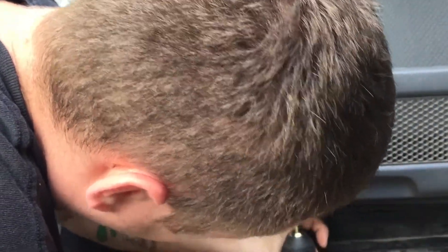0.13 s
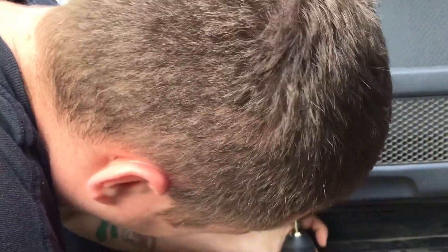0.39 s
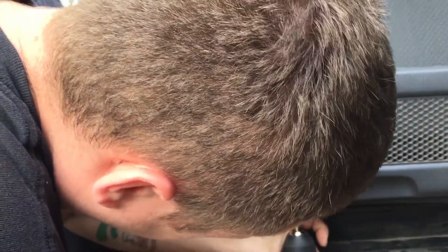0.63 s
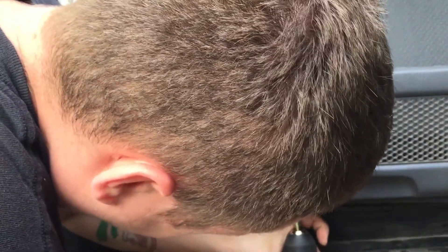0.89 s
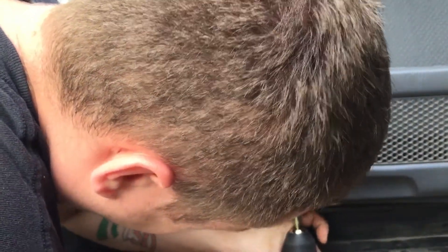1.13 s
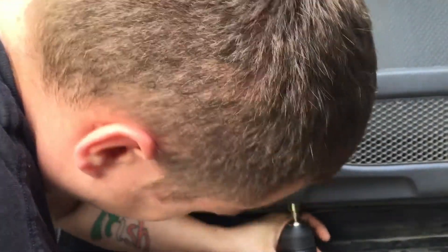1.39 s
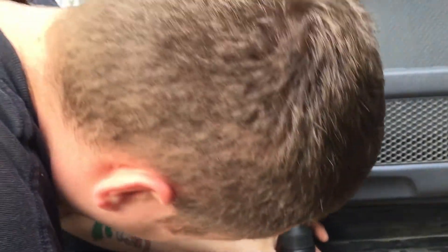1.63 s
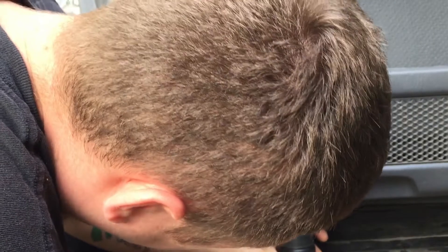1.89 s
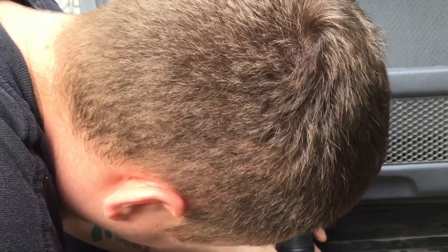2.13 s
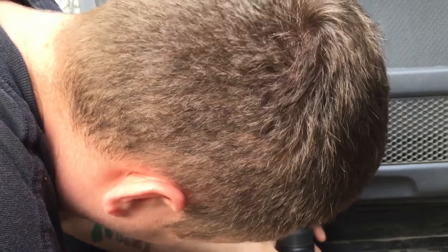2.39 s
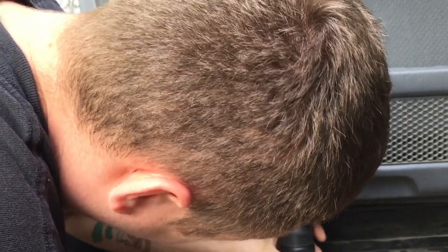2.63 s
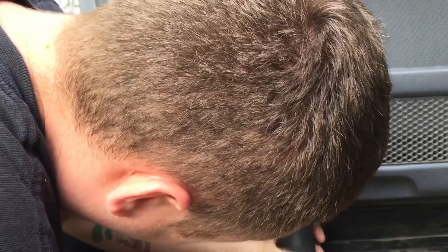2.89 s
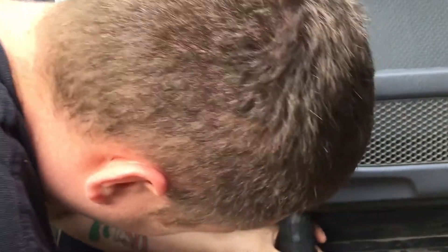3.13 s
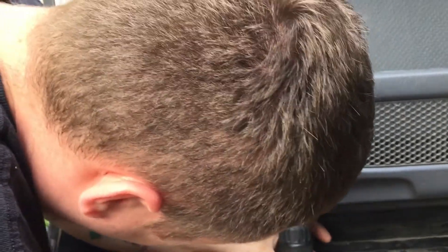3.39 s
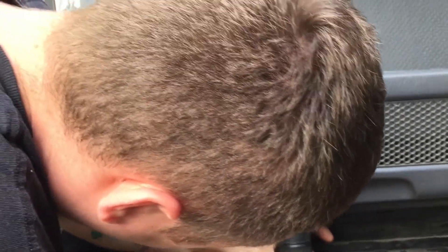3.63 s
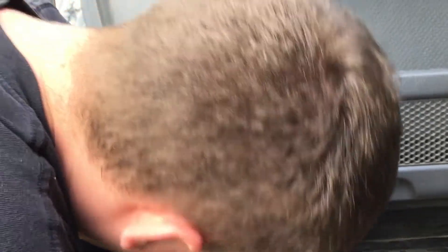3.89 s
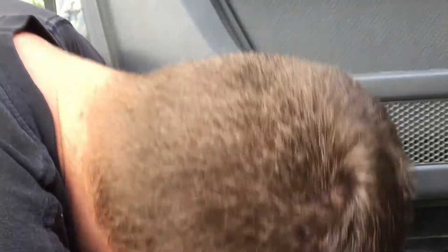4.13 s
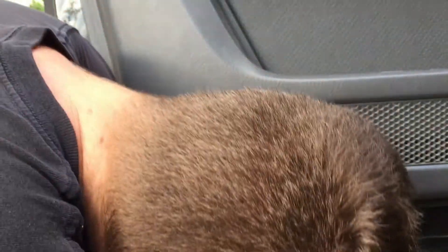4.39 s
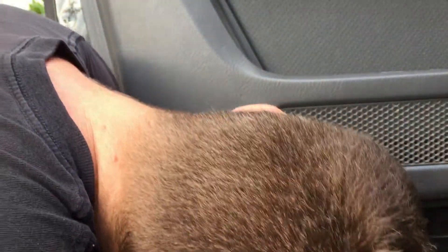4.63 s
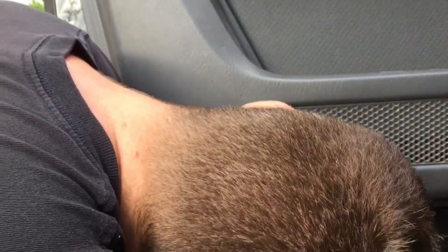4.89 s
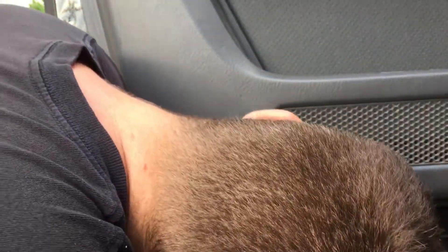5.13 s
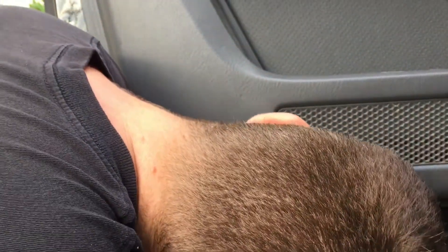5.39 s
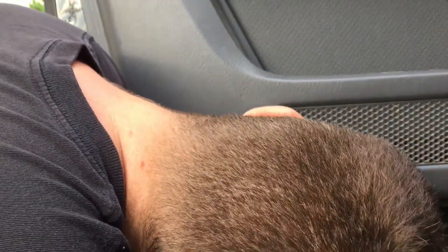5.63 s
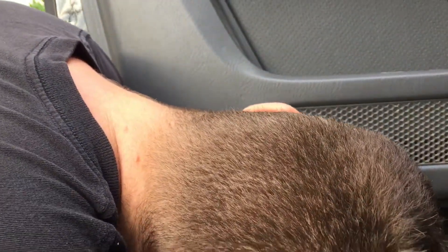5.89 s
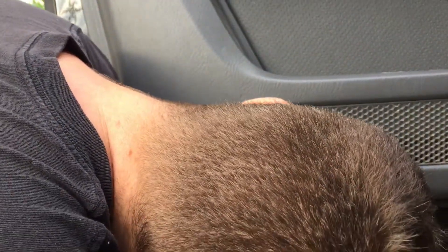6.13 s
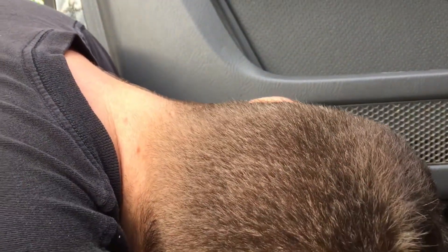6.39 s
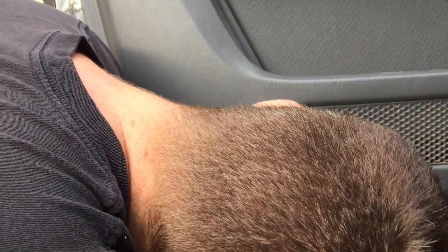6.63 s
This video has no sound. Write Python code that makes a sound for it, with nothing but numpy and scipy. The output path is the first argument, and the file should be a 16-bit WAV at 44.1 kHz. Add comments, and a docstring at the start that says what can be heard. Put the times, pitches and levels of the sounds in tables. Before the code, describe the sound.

Close harsh drill whine and gritty sawing on a plastic panel in three trigger pulls, with knocks, faint squeaks and low outdoor rumble between.

```python
"""A cordless drill is already whining as it drives a hole saw into a plastic door panel: three trigger pulls.
Motor and gears are sines locked to the rotor speed, over a grinding hiss that throbs once a turn.
The saw snags and blows ring the panel's modes; short squeaks are rough glides.
Outdoors lie a low resonant rumble, swelling hums, a faint noise floor and a thin insect-like whistle.
The door is close and echoes densely; one microphone feeds both channels."""
import sys
import numpy as np
from scipy import signal
from scipy.fft import rfft, irfft
from scipy.io import wavfile
from scipy.ndimage import uniform_filter1d

SR = 44100
rng = np.random.default_rng(int(sys.argv[2]) if len(sys.argv) > 2 else 0)


def boost_factor(decibels):
    """Convert a level in decibels to a linear amplitude factor."""
    exponent = np.asarray(decibels, float) / 20
    return 10 ** exponent


def int16_out(signal):
    """Quantize to a 16-bit WAV file."""
    q = np.round(np.clip(np.atleast_2d(signal).T, -1, 1) * 32767)
    wavfile.write(sys.argv[1], SR, q.astype(np.int16))


N = 298116   # length in samples


def curves(rows, before=None):
    """Columns of a table as sample curves; outside the table they hold, or take the value given."""
    s, *columns = np.transpose(rows)
    return [np.interp(np.arange(N) / SR, s, c, before, before) for c in columns]


def unit(x):
    """Scale to rms 1."""
    return x / np.sqrt(np.mean(x ** 2) + 1e-20)


def drift(rate):
    """Slow chance of spread 1, changing about rate times a second: noise through a double one-pole lowpass."""
    points_per_s = 400
    points = rng.standard_normal(int(N / SR * points_per_s) + points_per_s)
    r = np.exp(-2 * np.pi * rate / points_per_s)
    settled = signal.lfilter([1], [1, -2 * r, r * r], points)[points_per_s - 1:]
    slow = unit(settled)
    return np.interp(np.arange(N) / SR * points_per_s, np.arange(len(slow)), slow)


def colour(x, spectrum):
    """Give x the spectrum of (Hz, dB) points, joined over log frequency."""
    hz = np.maximum(np.arange(N // 2 + 1) * SR / N, 1)
    points = np.array(spectrum)
    level_db = np.interp(np.log(hz), np.log(points[:, 0]), points[:, 1])
    return irfft(rfft(x) * boost_factor(level_db), N)


def ring(x, hz, width_hz):
    """One resonance; a unit click rings at height 1."""
    r, w = np.exp(-np.pi * width_hz / SR), 2 * np.pi * hz / SR
    return signal.lfilter([0, np.sin(w)], [1, -2 * r * np.cos(w), r * r], x + 1e-18)


def line(turns, order, level_db, waver_db, blur):
    """A sine locked to the turns, its level (dB) and phase (rad) wandering."""
    level = np.sqrt(2) * boost_factor(level_db + waver_db * drift(12.2))
    return level * np.sin(2 * np.pi * order * turns + blur * drift(16.7))


def rotor():
    """The rotor spins up with a lag and slows ever faster once eased off; the gates follow the trigger."""
    # trigger pulls: pulled_s, eased_off_s, stopped_s, grind_db, treble_hiss_db
    pulls = [(-1, 3.125, 3.19, -31, -28), (3.619, 4.02, 4.15, -33, -31), (5.339, 9, 9, -29.8, -32.5)]
    # rotor speed that the load allows, one table a pull: time_s, speed_turns_per_s
    allowed_speed = [
        [(0, 297), (0.5, 296), (0.65, 293), (1.25, 291), (1.29, 262), (1.33, 240), (1.37, 236), (1.4, 254),
         (1.49, 264), (1.65, 263), (1.75, 258), (1.95, 244), (2.05, 242), (2.35, 241), (2.45, 235), (2.75, 232),
         (2.9, 222), (2.97, 223), (3.05, 247), (3.14, 262)],
        [(3.83, 282), (3.97, 284.5)],
        [(5.95, 281), (6.15, 275), (6.58, 275), (6.76, 266)],
    ]
    spin_up_lag, spin_up_s = 117, .048   # turns per s short at the pull, time constant of closing the gap
    brake = 3400   # turns per s lost per s squared
    attack_s, stop_db_per_s = .006, 900
    hiss_attack_s, hiss_stop_db_per_s, hiss_stops_early_s = .025, 600, .03

    t = np.arange(N) / SR
    pull = np.searchsorted([row[0] for row in pulls], t) - 1
    pulled, eased, stopped, grind_db, hiss_db = np.transpose(pulls)[:, pull]
    held = np.choose(pull, [curves(rows)[0] for rows in allowed_speed])
    lag = spin_up_lag * np.exp((pulled - t) / spin_up_s)
    speed = held - lag - brake * np.maximum(t - eased, 0) ** 2
    gate_db = 20 * np.log10(np.minimum((t - pulled) / attack_s, 1) + 1e-6)
    gate_db -= stop_db_per_s * np.maximum(t - stopped, 0)
    hiss_gate_db = 20 * np.log10(1 - np.exp((pulled - t) / hiss_attack_s) + 1e-6)
    hiss_gate_db -= hiss_stop_db_per_s * np.maximum(t - stopped + hiss_stops_early_s, 0)
    return pull, np.maximum(speed, 50), gate_db, hiss_gate_db, grind_db, hiss_db


def gear_lines(turns, speed, pull, bite, load, unsteady_db, gate_db):
    """Saw and gear teeth sound at fixed multiples of rotor speed; the housing favours some of their pitches."""
    slow_gear, fifth, mesh, saw = 3.912, 5, 7.4, .765   # multiples of rotor speed
    # slow gear, fifth order, mesh, its two overtones:
    # free_db, cutting_db, second_pull_db, third_pull_db, waver_db, blur_rad
    gears = [(-42, -36.5, -46, -47, 2.0, .7), (-45, -35, -46, -48, 1.0, .45), (-41, -34, -52, -37, 3.0, .6),
             (-47, -35.5, -46, -44, 3.0, .6), (-44, -38.5, -56, -50, 2.0, .9)]
    # rise of each gear line while the unloaded rotor changes speed: rise_db
    take_up_rises = [22, 0.5, -14, 2.5, -6]
    # how much of the unsteadiness each gear line loses in the first pull and while slowing: share
    break_up_shares = [.3, .01, .01, .3, 1.1]
    # pitches that the housing favours or mutes: pitch_hz, level_db
    housing = [(620, -3), (750, -14), (850, 2), (960, 0.1), (1080, 3), (1170, 5), (1290, -8), (1460, -1),
               (1750, -2), (1890, 6), (1960, 2), (2100, -1), (2900, -14), (3300, 1), (3550, 2), (3700, -8),
               (3900, 3), (4080, -1), (4200, -9), (5000, 2), (5250, -1), (5400, 2), (5560, -7), (5750, -1),
               (6200, -1)]
    # the mesh sings as the freed saw speeds up: start_s, length_s, rise_db
    freed_start, freed_length, freed_rise_db = (3.035, .09, 11)
    brake_take_up = .55   # share of the rise while slowing
    chatter_db, chatter_per_s = 5, 90   # the gears chatter while they take up the torque

    slowing = np.gradient(speed) < 0
    take_up = unsteady_db / unsteady_db.max() * (1 - load) * np.where(slowing, brake_take_up, 1)
    freed = np.clip((np.arange(N) / SR - freed_start) / freed_length, 0, 1)
    out = load * line(turns, saw, -40 + gate_db, waver_db=5.5, blur=0.2)
    orders = (slow_gear, fifth, mesh, 2 * mesh, 3 * mesh)
    for order, rise_db, share, row in zip(orders, take_up_rises, break_up_shares, gears):
        free_db, cut_db, second_db, third_db, waver_db, blur = row
        first_db = free_db + np.maximum(bite, 0) * (cut_db - free_db)
        level_db = np.choose(pull, [first_db, second_db, third_db])
        level_db += np.interp(order * speed, *np.transpose(housing))
        if order == mesh:
            level_db += freed_rise_db * np.sqrt(abs(np.sin(np.pi * freed)))
        level_db += (rise_db + chatter_db * drift(chatter_per_s)) * take_up
        level_db -= share * unsteady_db * ((pull == 0) | slowing)
        out += line(turns, order, level_db + gate_db, waver_db, blur)
    return out


def motor_lines(turns, pull, load, unsteady_db, gate_db, hiss_gate_db):
    """Motor and gear whine: low lines of motor and gears change level with load, and load smears the upper
    commutator lines."""
    # low motor and gear lines: multiple_of_rotor_speed, free_db, cutting_db, later_pulls_db
    low_orders = [(1, -42, -47, -46), (1.304, -61, -46, -60), (2, -51, -48, -49), (2.608, -43, -49, -44),
                  (5.216, -46, -43, -41), (6, -57, -57, -48), (6.52, -42, -52, -41), (10, -48, -47, -54),
                  (12, -49, -60, -63), (15, -44, -46, -55), (16, -56, -63, -58), (17, -57, -64, -50)]
    # clearer commutator lines: multiple_of_rotor_speed, first_pull_db, second_pull_db, third_pull_db
    upper_orders = [(20, -44, -45, -52), (22, -50, -40, -48), (25, -53, -45, -54), (27, -52, -60, -59),
                    (28, -55, -49, -58), (30, -48, -55, -60), (33, -57, -50, -60), (34, -59, -57, -49),
                    (35, -54, -57, -51), (37, -46, -60, -55), (38, -51, -62, -57), (39, -62, -55, -50),
                    (41, -62, -49, -58), (42, -60, -51, -58), (43, -54, -54, -59), (47, -45, -59, -60)]
    faint_db, cut_smear_db = -61, 7   # level of all other upper lines; loss of upper lines at full load

    out = np.zeros(N)
    for order, free_db, cut_db, later_db in low_orders:
        level_db = np.where(pull == 0, free_db + load * (cut_db - free_db), later_db)
        level_db = level_db + gate_db - np.clip(order / 12, .4, 1.1) * unsteady_db
        out += line(turns, order, level_db, waver_db=3.0, blur=0.43)
    clear = {row[0]: row[1:] for row in upper_orders}
    for order in range(18, 52):
        level_db = np.choose(pull, clear.get(order, [faint_db] * 3)) - cut_smear_db * load
        level_db = level_db + hiss_gate_db - 1.4 * unsteady_db
        out += line(turns, order, level_db, waver_db=2.5, blur=.4)
    return out


def grinding_hiss(turns, bite, load, grind_db, hiss_db, gate_db, hiss_gate_db):
    """Teeth and brushes rub unevenly round the turn: throbbing noise, split at 3 kHz into grind and hiss."""
    # shape of the grinding noise before the split: pitch_hz, level_db
    grind_spectrum = [(150, -8), (250, -23.5), (290, -6.5), (425, -10.5), (580, -4), (800, -5.5), (940, 2),
                      (1150, -3.5), (1310, -5.5), (1500, -2), (2090, 2), (2400, -6.5), (2750, -9.5),
                      (4600, -16.5), (5400, -15.5), (8500, -21), (13200, -21), (15900, -27)]
    bite_grind_db, bite_hiss_db = 5.2, -1.8   # change per unit of bite, change at full load
    freed_hiss_db = 6   # loss of treble hiss per unit of bite below zero, once the saw is through
    snag_s, snag_hiss_db, snag_dip_s = 3.03, -6, .035   # the treble hiss dips as the saw breaks through

    throb = boost_factor(1.6 * np.sin(2 * np.pi * turns) + 0.95 * drift(59))
    snag_db = snag_hiss_db * np.exp(-((np.arange(N) / SR - snag_s) / snag_dip_s) ** 2)
    low_db = grind_db + bite_grind_db * bite + gate_db
    high_db = hiss_db + bite_hiss_db * load + freed_hiss_db * np.minimum(bite, 0) + snag_db + hiss_gate_db
    out = np.zeros(N)
    for kind, level_db in (("low", low_db), ("high", high_db)):
        noise = colour(rng.standard_normal(N) * throb, grind_spectrum)
        split = signal.butter(2, 3000, kind, fs=SR, output="sos")
        out += boost_factor(level_db) * unit(signal.sosfilt(split, noise))
    return out


def drill():
    """One rotor drives the gear lines, the motor lines and the grinding hiss; the bite loads it in the first pull."""
    # how deep the teeth bite (0 running free, 1 cutting, below 0 freed): time_s, bite
    bite_depth = [(1.25, 0.01), (1.29, 1.6), (1.33, 1.45), (1.4, .8), (1.65, .95), (2.2, 1.1), (2.98, 1.05),
                  (3.03, .3), (3.11, -.35), (3.17, -.9)]
    pull, speed, gate_db, hiss_gate_db, grind_db, hiss_db = rotor()
    bite = curves(bite_depth)[0] * (pull == 0)
    load = np.clip(bite, 0, 1)
    turns = np.cumsum(speed * (1 + 0.0005 * drift(7.55))) / SR
    # the fine lines break up while the rotor changes speed
    speed_change = uniform_filter1d(abs(np.gradient(speed)) * SR, 900)
    unsteady_db = np.minimum(0.011 * speed_change, 18)
    gears = gear_lines(turns, speed, pull, bite, load, unsteady_db, gate_db)
    motor = motor_lines(turns, pull, load, unsteady_db, gate_db, hiss_gate_db)
    return gears + motor + grinding_hiss(turns, bite, load, grind_db, hiss_db, gate_db, hiss_gate_db)


def nearby_door(x, echo_db, t60):
    """Dense early echoes off door and sill give the sound fixed, fine ripples."""
    t = np.arange(int(t60 * SR)) / SR
    echoes = rng.standard_normal(len(t)) * boost_factor(-60 * t / t60) * (t > .0008)
    return x + boost_factor(echo_db) * signal.fftconvolve(x, echoes / np.linalg.norm(echoes))[:N]


def rumble():
    """Low outdoor rumble: noise through doubled resonances, its level drifting."""
    # resonances: pitch_hz, width_hz, level_db
    peaks = [(63, 10, -12), (104, 49.5, -1), (162.2, 74, -1.5), (235.8, 50, -9), (353, 89, -18)]
    # level of the whole rumble: time_s, level_db
    rumble_level = [(0, -37.5), (5.85, -36.5), (6.76, -30.5)]
    out = np.zeros(N)
    for hz, width_hz, db in peaks:
        once = ring(rng.standard_normal(N), hz, width_hz)
        out += boost_factor(db) * unit(ring(once, hz, width_hz))
    return boost_factor(curves(rumble_level)[0] + 2.4 * drift(1.0)) * unit(out)


def faint_floor():
    """Faint broad noise whose level drifts a little."""
    # shape of the floor: pitch_hz, level_db
    floor_spectrum = [(240, -35), (400, -9), (1390, -14), (1500, -16), (1570, -17), (1780, -16),
                      (15800, -43.5)]
    return boost_factor(-58.5 + 0.94 * drift(7.1)) * unit(colour(rng.standard_normal(N), floor_spectrum))


def hum():
    """Low wandering sines that swell and fade now and then."""
    # swells: start_s, length_s, pitch_hz, level_db
    swells = [(.35, .6, 97, -42), (2.1, .8, 103, -39), (3.25, .8, 104, -33), (4.35, .8, 105, -37),
              (5.42, .38, 120, -25), (1.45, .55, 104, -39), (5.9, .5, 103, -35), (6.3, .6, 172, -39)]
    t = np.arange(N) / SR
    out = np.zeros(N)
    for s, length, hz, db in swells:
        swell = abs(np.sin(np.pi * np.clip((t - s) / length, 0, 1))) ** .7
        out += swell * line(hz * t, 1, db, waver_db=2.5, blur=0.4)
    return out


def knocks():
    """Each blow rings the panel modes and thumps the door; a hard blow cracks and rings brighter."""
    # blows on the panel: time_s, ring_db, thump_db, crack_db
    blows = np.array([(1.252, -8.5, -18.5, -17), (1.257, -13, -30, -24), (1.262, -10, -15.5, -27),
                      (1.268, -14, -12, -29), (1.283, -5, -23, -7), (1.3, -13, -19, -30),
                      (1.313, -19.5, -25, -22), (2.98, -17.5, -24, -30), (3.002, -2.5, -25, -13),
                      (3.013, -9, -15.5, -25), (3.019, -31, -20, -17), (3.032, 3, -23, -46),
                      (3.036, -29.5, -13, -34), (3.231, -9.5, -27, -40), (3.263, -21, -29, -12.5),
                      (3.271, -19, -40, -66), (3.359, -41, -43, -54), (4.389, -24.5, -31.5, -71),
                      (4.415, -48, -35, -64), (5.252, -20.5, -42, -59), (5.257, -35, -24, -36.5),
                      (5.278, -37, -31, -63)])
    # panel modes: pitch_hz, level_db, t60_s
    panel_modes = [(317, -8.5, 0.055), (515, -1.5, 0.024), (624, -3.5, 0.034), (740, -15.5, 0.069),
                   (951, -4, 0.025), (1508, -9, 0.015), (1900, -12, 0.036), (2510, -16, .013),
                   (3600, -16, .01), (4900, -18, .008)]
    # the door as a whole: pitch_hz, level_db, t60_s
    door_modes = [(54, -5, 0.3), (101, 0.5, 0.2), (154.6, -2, 0.19), (226, -3.5, 0.07)]

    at = np.round(blows[:, 0] * SR).astype(int)
    hardness_db = np.clip(blows[:, 3] - blows[:, 1] + 19, -15, 15)
    spread = rng.standard_normal((len(at), len(panel_modes) + len(door_modes)))
    out = np.zeros(N)
    for k, (hz, level_db, t60) in enumerate(panel_modes + door_modes):
        blow_db = blows[:, 1 + (k >= len(panel_modes))]   # ring for the panel, thump for the door
        tilt_db = 0.3 * hardness_db * max(np.log2(hz / 700), 0)
        clicks = np.zeros(N)
        clicks[at] = boost_factor(blow_db + level_db + tilt_db + 2.07 * spread[:, k]) * (-1) ** k
        soft = signal.lfilter([.3], [1, -.7], clicks)
        out += ring(soft, hz, np.log(1000) / np.pi / t60)
    clicks = np.zeros(N)
    clicks[at] = boost_factor(blows[:, 3])
    fast = signal.lfilter([1], [1, -boost_factor(-60 / (0.011 * SR))], clicks)
    tail = signal.lfilter([boost_factor(-24.5)], [1, -boost_factor(-60 / (.15 * SR))], clicks)
    swell = signal.lfilter([.03], [1, -.97], fast + tail)   # the crack builds over a millisecond
    band = signal.butter(2, [1500, 7500], "band", fs=SR, output="sos")
    return out + swell * signal.sosfilt(band, rng.standard_normal(N))


def whistle():
    """Thin insect-like phrases: gliding sines, each spread into a narrow hiss by slow noise."""
    # phrases: start_s, length_s, first_hz, last_hz, level_db
    phrases = [(3.36, .3, 9850, 9850, -71), (4.1, .45, 9830, 9770, -61), (4.85, .22, 9780, 9860, -66),
               (5.06, .32, 9920, 9990, -61)]
    # partials: pitch_ratio, level_db
    partials = [(1, 0), (1.235, -9), (1.315, -17)]
    fade_s = .1
    t = np.arange(N) / SR
    lowpass = signal.butter(3, 150, fs=SR, output="sos")
    out = np.zeros(N)
    for s, length, first_hz, last_hz, db in phrases:
        hz = np.interp(t, [s, s + length], [first_hz, last_hz])
        fade = np.clip(np.minimum(t - s, s + length - t) / fade_s, 0, 1)
        for ratio, part_db in partials:
            scratch = unit(signal.sosfilt(lowpass, rng.standard_normal(N)))
            tone = scratch * np.sin(2 * np.pi * ratio * np.cumsum(hz) / SR)
            out += fade * boost_factor(db + part_db + 3.0 * drift(15)) * tone
    return out


def squeaks():
    """Faint squeaks while the drill is shifted: short glides roughened by smoothed noise."""
    # glides: start_s, length_s, first_hz, last_hz, level_db
    glides = [(3.568, .022, 1900, 2350, -43), (4.96, 0.014, 2000, 1900, -53), (4.97, 0.07, 5320, 3840, -60),
              (5.02, .016, 2000, 1700, -61), (5.135, 0.026, 3100, 3070, -56),
              (5.228, 0.039, 3200, 3080, -50)]
    out, rough = np.zeros(N), unit(uniform_filter1d(rng.standard_normal(N), size=110))
    for s, length, first_hz, last_hz, db in glides:
        at, n = round(s * SR), round(length * SR)
        glide = np.sin(2 * np.pi * np.cumsum(np.linspace(first_hz, last_hz, n)) / SR)
        out[at:at + n] += boost_factor(db) * np.hanning(n) ** .3 * glide * rough[at:at + n]
    return out


def scene():
    """Drill, blows and squeaks echo off the nearby door, the outdoors does not; one microphone feeds both channels."""
    at_door = nearby_door(drill() + knocks() + squeaks(), echo_db=-11, t60=0.094)
    outdoors = rumble() + faint_floor() + hum() + whistle()
    mid = at_door + outdoors
    return np.array([mid, mid])


def low_pass(x):
    """Removes everything above the highest recorded frequency."""
    return signal.sosfilt(signal.butter(12, 16480, fs=SR, output="sos"), x)


def record(dry):
    """The microphone channel loses the lowest bass and the top, and its peaks are rounded."""
    bass_cut = signal.butter(4, 48, "high", fs=SR, output="sos")
    top_cut = signal.ellip(12, 1, 70, 15780, fs=SR, output="sos")
    cut = signal.sosfilt(top_cut, signal.sosfilt(bass_cut, dry))
    mix = 1.037 * np.tanh(cut / 1.38)
    return low_pass(mix)


dry = scene()
out = record(dry)
int16_out(out)
```